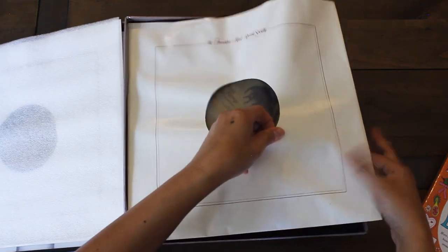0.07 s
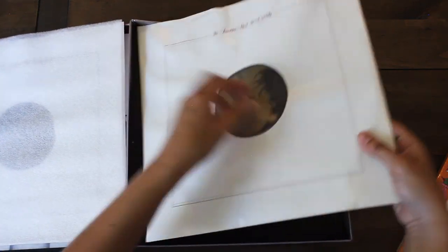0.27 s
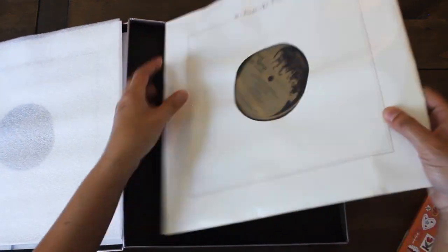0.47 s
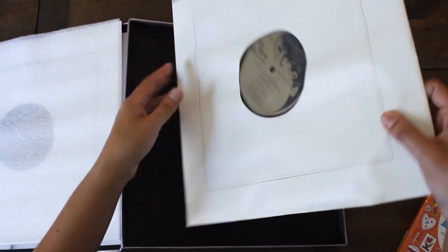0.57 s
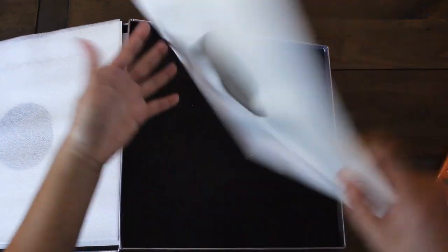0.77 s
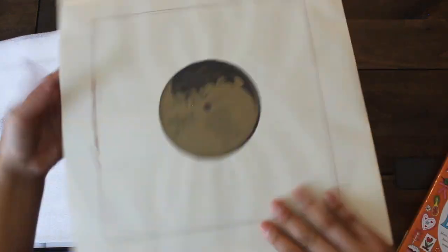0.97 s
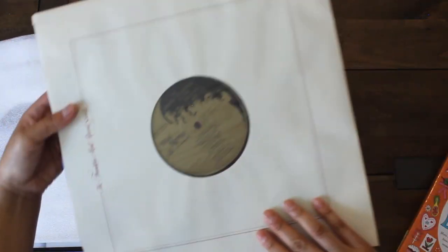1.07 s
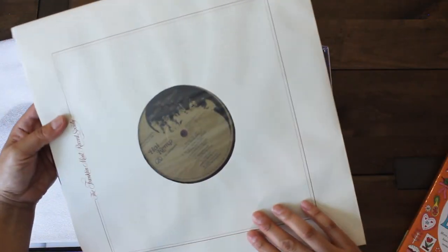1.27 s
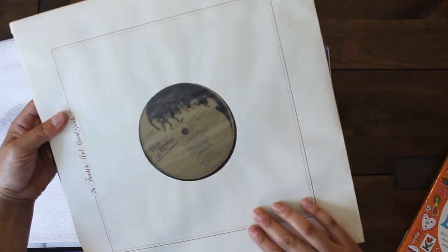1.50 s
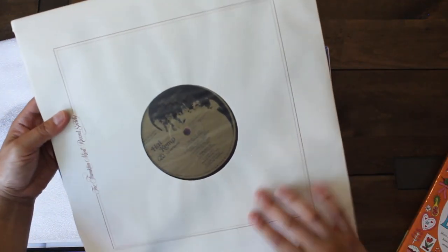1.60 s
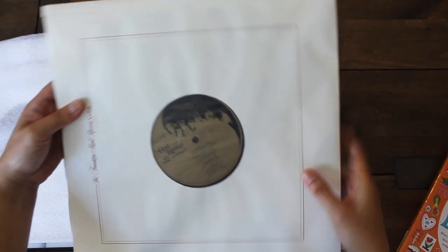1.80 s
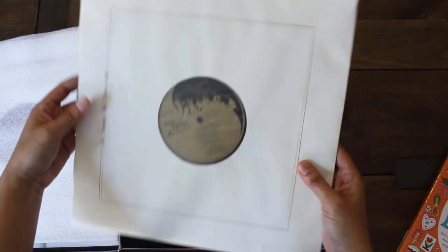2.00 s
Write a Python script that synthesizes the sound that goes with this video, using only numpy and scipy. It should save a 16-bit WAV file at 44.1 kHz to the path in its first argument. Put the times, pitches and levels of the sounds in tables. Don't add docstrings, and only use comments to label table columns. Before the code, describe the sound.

A paper-sleeved vinyl record is dragged from a cardboard box, knocking hard and hollow early on, then once more, before faint paper snaps and soft pats; close microphone in a live room with low hum.

```python
import sys
import numpy as np
from scipy import signal
from scipy.fft import rfft, irfft
from scipy.io import wavfile

SR = 44100
rng = np.random.default_rng(int(sys.argv[2]) if len(sys.argv) > 2 else 0)


def decibels_to_gain(level_db):
    exponent = np.asarray(level_db, float) / 20
    return 10 ** exponent


def transcribe(u):
    v = np.clip(np.atleast_2d(u).T, -1, 1)
    q = np.round(v * 32767).astype(np.int16)
    wavfile.write(sys.argv[1], SR, q)


N = 90404

# pitch in Hz, level in dB.
FLOOR_TONE = [(20, -12), (60, -14), (110, -3), (200, -11), (350, -4), (500, -11.5), (3000, -26),
              (16000, -29.5)]
# time in seconds, level in dB.
SLIDE_LEVEL = [(0, -52.5), (.07, -54), (.18, -54), (.21, -40.5), (.3, -40), (.42, -54), (.52, -40),
               (.57, -53), (.79, -58.5), (.83, -47), (.862, -55), (.93, -45.5), (1.1, -54.5), (1.2, -61.5),
               (1.63, -63), (1.69, -55.5), (1.94, -64.5), (1.98, -49), (2.05, -50.5)]
# pitch in Hz, level in dB.
SLIDE_TONE = [(1500, -4.5), (2500, -1.5), (4500, 3), (7000, -1.5), (10000, -5.5), (16000, -9.5)]
# time in seconds, level in dB.
DRAG_LEVEL = [(0, -40), (.06, -34.5), (.09, -46), (.16, -41.5), (.2, -27.5), (.25, -31), (.27, -37),
              (.33, -20.5), (.4, -22.5), (.5, -31.5), (.6, -30.5), (.75, -38), (.85, -45.5), (1.1, -47.5),
              (1.3, -55.5), (1.94, -52.5), (1.98, -36), (2.05, -42.5)]
# pitch in Hz, level in dB.
DRAG_TONE = [(80, -35), (200, -5.5), (330, -3), (500, -3.5), (1200, -4.5), (2500, -10), (6000, -23.5),
             (12000, -51)]
# pitch in Hz, level in dB, time to fade by 60 dB in seconds.
BOX_NOTES = [(128, -8.5, 0.053), (200, -22, 0.06), (300, -16.5, 0.06), (466, -9, 0.022), (505, 1, 0.069),
             (623, -9, 0.01), (790, 0, 0.042), (1025, 0, 0.023), (1200, 2.5, 0.02), (1740, 1, 0.015),
             (1983, -7, 0.027), (2420, -7, 0.011)]
# start in seconds, peak in dB, contact length in seconds, hardness in Hz.
KNOCKS = [(0.037, -40, 0.0075, 1500), (0.168, -25, 0.0036, 3000), (0.223, -13, 0.0027, 4000),
          (0.292, -2.5, 0.0045, 2580), (.297, 2.5, 0.0041, 4020), (.300, -2.5, 0.0037, 3000),
          (0.303, -7, 0.0031, 2500), (.307, -10.5, 0.0028, 3000), (0.312, -10.5, 0.0034, 3000),
          (.315, -7, 0.0016, 1530), (.321, -9, 0.003, 1980), (0.33, -18, 0.0051, 2500),
          (.356, -24, .004, 2010), (0.378, -13, 0.011, 2560), (0.395, -18.5, 0.0044, 2450),
          (.405, -22, 0.0028, 2000), (.532, -6.5, 0.0011, 890), (.537, -4, 0.0051, 3000),
          (0.548, -10.5, .003, 2000), (0.596, -10, 0.0069, 2000)]
# start in seconds, peak in dB, length in seconds, pitch in Hz.
LIFT_SNAPS = [(.069, -28.5, 0.0058, 2520), (0.122, -29, 0.0015, 12500), (0.1695, -24, 0.0014, 4150),
              (.161, -43, .002, 1500), (0.1737, -11.5, 0.0034, 1100), (.1735, -12, 0.0024, 3130),
              (.194, -23, 0.0036, 7500), (.209, -37, .001, 6500), (.212, -24, .003, 4000),
              (.221, -31, .002, 8500), (0.2240, -9, 0.0038, 1450), (.2245, -7, 0.0023, 3620),
              (.239, -20, .002, 7000), (0.235, -13.5, 0.006, 3030), (.246, -20, 0.0035, 2480),
              (0.2805, -5.5, 0.0048, 1640), (.2801, -6.5, 0.0027, 4500), (.292, -11.5, 0.001, 3520),
              (0.2979, 3.5, 0.0028, 2480), (.305, -9.5, 0.0033, 2620), (.31, -10, .002, 4000),
              (0.2963, -7.5, 0.0037, 7400), (0.3766, -15, 0.0044, 5760), (0.475, -18, 0.0038, 5300),
              (0.5184, -14.5, 0.0039, 4130), (.523, -18, 0.0024, 8800), (0.5356, -1.5, 0.0015, 1780),
              (.5352, -10, 0.0014, 7360), (.5352, -21, 0.0031, 12500), (.585, -38, .001, 5500),
              (0.595, -31, .001, 4000), (0.704, -27, 0.0008, 4700)]
# start in seconds, peak in dB, length in seconds, pitch in Hz.
HOLD_SNAPS = [(0.886, -25, 0.0012, 2600), (.9105, -17.5, 0.0017, 6000), (.926, -19, 0.0011, 2300),
              (.966, -32, 0.0013, 3300), (1.06, -29, 0.0017, 4500), (1.086, -24.5, 0.00094, 4300),
              (1.113, -27, 0.0011, 5040), (1.1565, -19.5, .0006, 4800), (1.157, -22.5, 0.00058, 10900),
              (1.163, -28, 0.003, 4600), (1.3643, -36.5, 0.0014, 4950), (1.662, -33, 0.00091, 4070),
              (1.6652, -29.5, 0.0013, 4600), (1.697, -34, 0.0012, 4560), (1.722, -31, 0.00091, 4700),
              (1.747, -33, .001, 4440), (1.8214, -21, 0.0026, 12000), (1.827, -25, 0.0022, 5040),
              (1.859, -29, 0.0017, 5040), (1.886, -33, 0.0011, 4000), (1.908, -37, .001, 2980),
              (1.934, -35, .0015, 4200), (1.9493, -21.5, 0.0014, 4700), (1.966, -26, 0.0025, 4750),
              (2.008, -30, .004, 3500), (2.018, -28, .004, 5500)]
# start in seconds, peak in dB, contact length in seconds, pitch in Hz.
PATS = [(0.2154, -10.5, 0.008, 1650), (0.222, -14.5, 0.0059, 1200), (0.238, -26, 0.0023, 910),
        (0.247, -12, 0.0018, 1510), (0.248, -22, 0.0012, 1110), (1.003, -29, 0.0019, 870),
        (1.058, -31, 0.0026, 693), (1.087, -31, 0.0016, 393), (1.164, -34.5, .006, 340),
        (1.199, -36.5, 0.00096, 300), (1.661, -43, 0.0012, 1200), (1.747, -39, 0.0011, 1200),
        (1.828, -41, 0.00083, 1200), (1.697, -40, .0015, 1200), (1.884, -39, 0.0015, 600),
        (1.909, -39, .0015, 1600), (1.969, -25.5, 0.011, 600), (1.975, -18.5, 0.0064, 1610),
        (1.9774, -22.5, 0.0023, 1580), (1.978, -13.5, 0.001, 550), (1.987, -27, 0.0025, 2740),
        (1.99, -31, 0.0036, 700), (1.999, -33.5, 0.0033, 600), (2.016, -31.5, 0.0045, 1320),
        (1.973, -18.5, 0.0024, 4600), (1.978, -13.5, .001, 4000)]
# start in seconds, peak in dB, pitch in Hz.
WOBBLES = [(.293, 0, 505), (0.2984, -3, 505), (0.2963, -3.5, 1032), (.301, -4.5, 1200), (.536, -18.5, 790),
           (.538, -8, 516), (.597, -13.5, 484), (0.61, -13, 496), (.645, -18.5, 470), (.668, -19, 475),
           (0.702, -19.5, 490), (.718, -19, 460), (.736, -23.5, 493), (.82, -39, 487), (0.841, -31, 470),
           (0.864, -37.5, 496), (0.984, -34.5, 300)]
# pitch in Hz, time to fade by 60 dB in seconds.
ROOM_FADE = [(100, 1), (250, 0.31), (500, 0.97), (1500, 0.91), (3000, 0.44), (6000, 0.44), (14000, 0.48)]


def rms_one(x):
    return x / np.sqrt(np.mean(x ** 2) + 1e-20)


def in_time(rows):
    seconds, db = np.transpose(rows)
    return decibels_to_gain(np.interp(np.arange(N) / SR, seconds, db))


def at_hz(rows, hz):
    table_hz, values = np.transpose(rows)
    return np.interp(np.log(hz + 1), np.log(table_hz), values)


def colour(x, tone):
    hz = np.arange(N // 2 + 1) * SR / N
    return rms_one(irfft(rfft(x) * decibels_to_gain(at_hz(tone, hz)), N))


def drift(rate_hz):
    r = np.exp(-2 * np.pi * rate_hz / SR)
    wander = signal.lfilter([1], [1, -2 * r, r * r], rng.standard_normal(N + SR))
    return rms_one(wander[SR:])


def grains(per_s, spread_db):
    sizes = decibels_to_gain(spread_db * np.minimum(rng.exponential(1, N), 3)) * rng.choice([-1, 1], N)
    slips = sizes * (rng.random(N) < per_s / SR)
    return rms_one(slips) + 1.5 * rng.standard_normal(N)


def ring(force, hz, fade_s):
    r = decibels_to_gain(-60 / (fade_s * SR))
    w = 2 * np.pi * hz / SR
    return signal.lfilter([0, np.sin(w)], [1, -2 * r * np.cos(w), r * r], force + 1e-18)


def contact(length_s, give=7.0):
    t = np.arange(4096) / SR
    rattle = rng.standard_normal(4096) * np.exp(-t / length_s)
    rattle *= 1 - np.exp(-t / 0.00021)
    rattle[4] += give
    return rattle


def add(out, start_s, peak_db, sound):
    i = int(start_s * SR)
    sound = decibels_to_gain(peak_db) * sound / np.abs(sound).max()
    out[i:i + len(sound)] += sound[:N - i]


def box(force, vary_db):
    out = np.zeros(len(force))
    for hz, db, fade_s in BOX_NOTES:
        out += decibels_to_gain(db + vary_db * rng.normal()) * ring(force, hz, fade_s)
    return out


def one_note(force, hz, fade_s):
    band = signal.butter(1, [hz / 2, hz * 2], "band", fs=SR)
    return ring(signal.lfilter(*band, force), hz, fade_s)


def background():
    hum = np.sqrt(2) * np.sin(2 * np.pi * 99.9 * np.arange(N) / SR)
    noise = colour(rng.standard_normal(N), FLOOR_TONE)
    return decibels_to_gain(-51) * noise + decibels_to_gain(-53.5) * hum


def slide():
    clumps = decibels_to_gain(2.5 * drift(36))
    hiss = grains(4000, spread_db=-5) * clumps
    return decibels_to_gain(5.5) * in_time(SLIDE_LEVEL) * colour(hiss, SLIDE_TONE)


def drag():
    slips = grains(900, spread_db=2)
    hollow = rms_one(box(slips, vary_db=12.5))
    return decibels_to_gain(-2) * in_time(DRAG_LEVEL) * (colour(slips, DRAG_TONE) + decibels_to_gain(-18) * hollow)


def knocks():
    out = np.zeros(N)
    for start_s, db, length_s, hardness_hz in KNOCKS:
        soften = signal.butter(1, hardness_hz, fs=SR)
        force = signal.lfilter(*soften, contact(length_s))
        add(out, start_s, db, box(force, vary_db=1.5))
    return out


def snaps(rows, edge_db):
    out = np.zeros(N)
    width = 0.42
    bright = signal.butter(2, 3000, "high", fs=SR, output="sos")
    for start_s, db, length_s, hz in rows:
        force = contact(length_s)
        band = signal.butter(1, [hz * (1 - width), hz * (1 + width)], "band", fs=SR)
        body = signal.lfilter(*band, signal.lfilter(*band, force))
        edge = signal.sosfilt(bright, force)
        add(out, start_s, db, rms_one(body) + decibels_to_gain(edge_db) * rms_one(edge))
    return out


def pats():
    out = np.zeros(N)
    for start_s, db, length_s, hz in PATS:
        add(out, start_s, db, one_note(contact(length_s), hz, fade_s=6 / hz))
    return out


def wobbles():
    out = np.zeros(N)
    for start_s, db, hz in WOBBLES:
        add(out, start_s, db, one_note(contact(0.003, give=2.5), hz, fade_s=0.03))
    return out


def room(x):
    t = np.arange(SR) / SR
    echo = np.zeros(SR)
    for low_hz in 62.5 * 2.0 ** np.arange(8):
        band = signal.butter(2, [low_hz, 2 * low_hz], "band", fs=SR, output="sos")
        fade = decibels_to_gain(-60 * t / at_hz(ROOM_FADE, 1.72 * low_hz))
        echo += signal.sosfilt(band, rng.standard_normal(SR)) * fade
    echo *= 1 - np.exp(-t / 0.0029)
    echo /= np.sqrt(np.sum(echo ** 2))
    return decibels_to_gain(-10) * signal.fftconvolve(x, echo)[:N]


def scene():
    low_cut = signal.butter(3, 120, "high", fs=SR, output="sos")
    paper = slide() + snaps(LIFT_SNAPS, edge_db=-28.5) + snaps(HOLD_SNAPS, edge_db=-8)
    sharp = signal.sosfilt(low_cut, paper + drag() + knocks())
    dull = signal.sosfilt(low_cut, pats() + wobbles())
    echoes = room(sharp + 0.47 * dull)
    return (sharp + dull + echoes + background())[None]


def top_cut(x):
    return signal.sosfilt(signal.butter(12, 16470, fs=SR, output="sos"), x)


def record(dry):
    clipped = np.clip(dry, -1, 1)
    treble_cut = signal.cheby2(10, 30, 16000 * 1.03, fs=SR, output="sos")
    mix = signal.sosfilt(treble_cut, clipped)
    return top_cut(mix)


dry = scene()
out = record(dry)
transcribe(out)
```